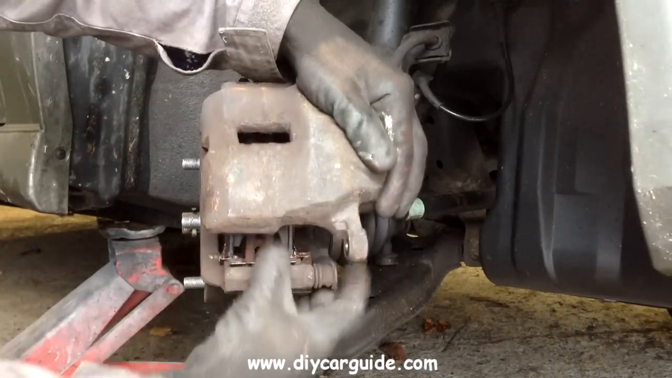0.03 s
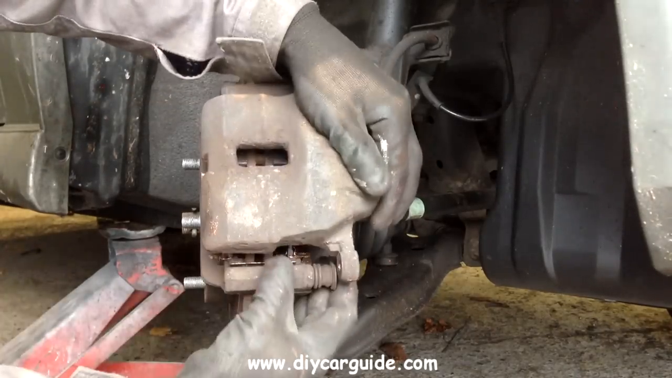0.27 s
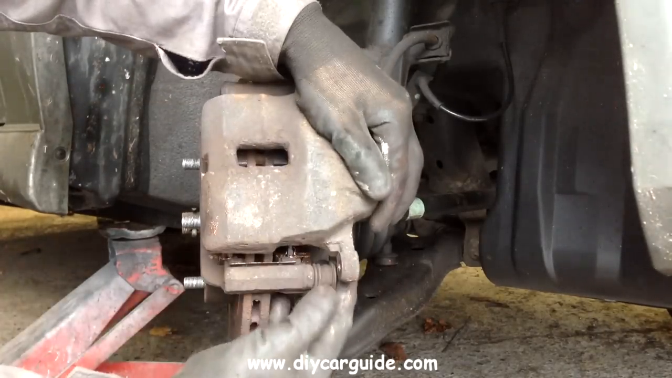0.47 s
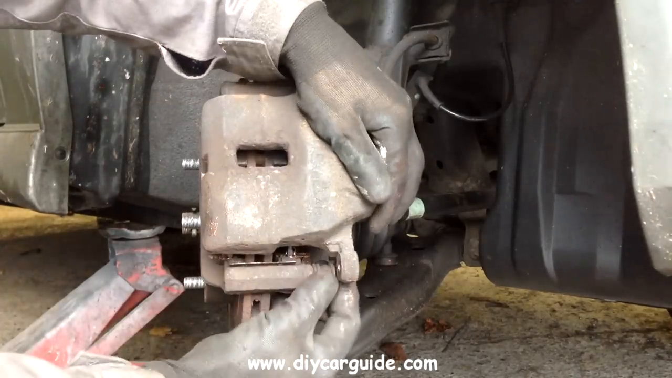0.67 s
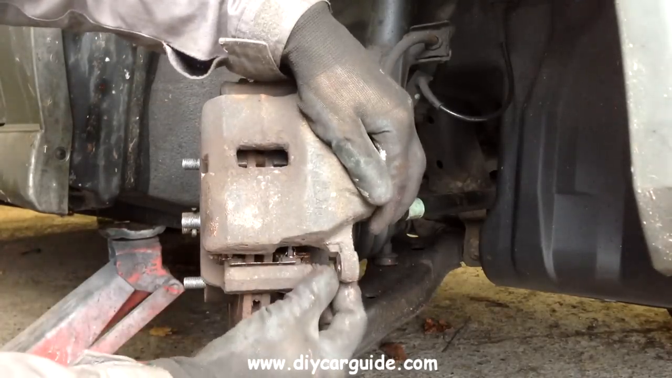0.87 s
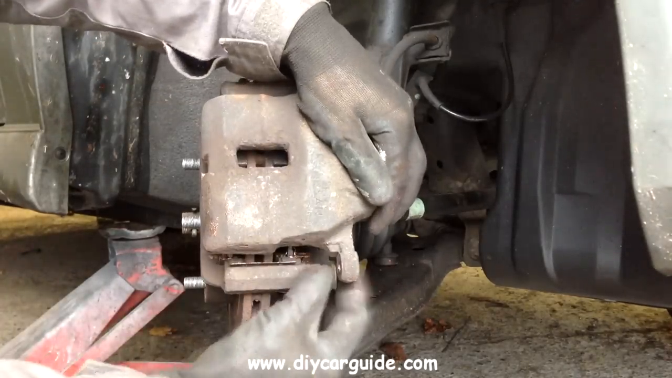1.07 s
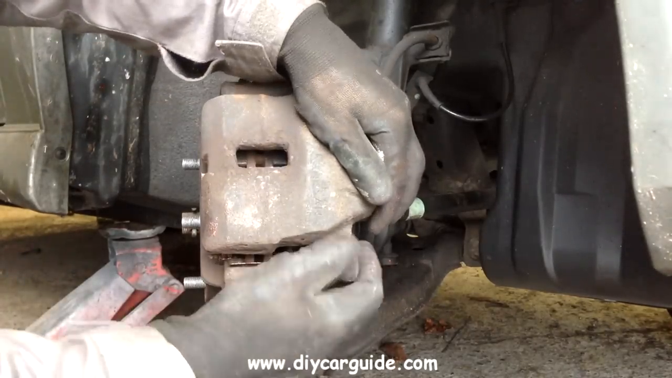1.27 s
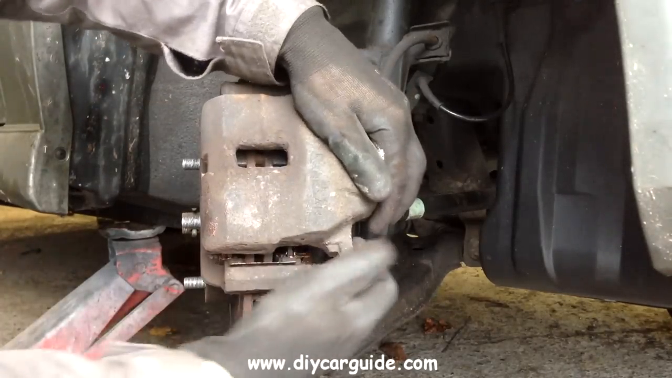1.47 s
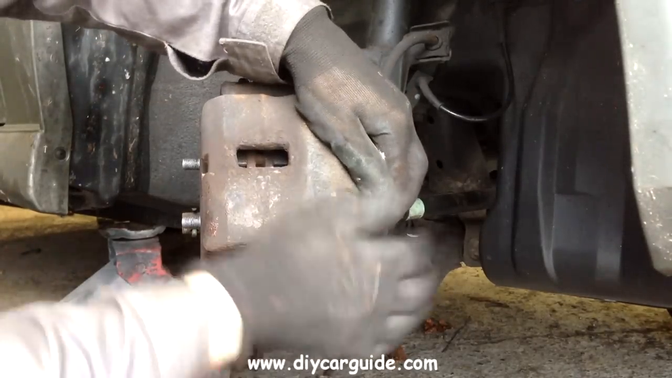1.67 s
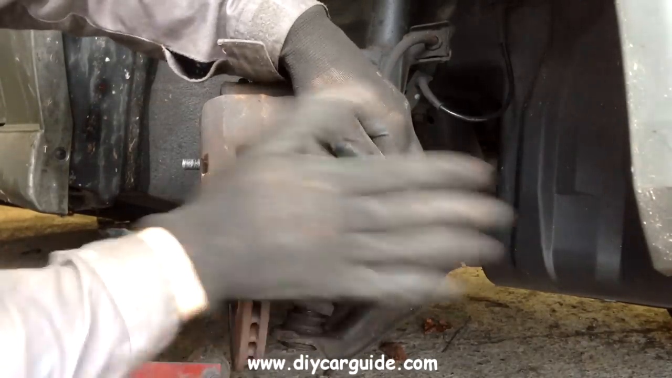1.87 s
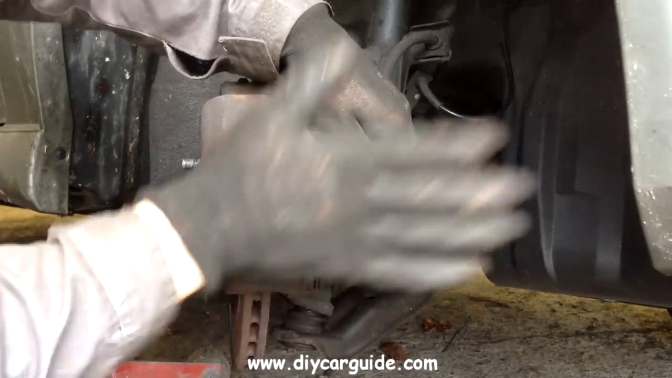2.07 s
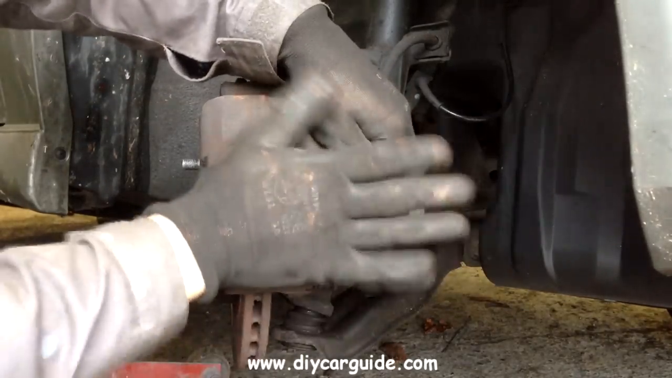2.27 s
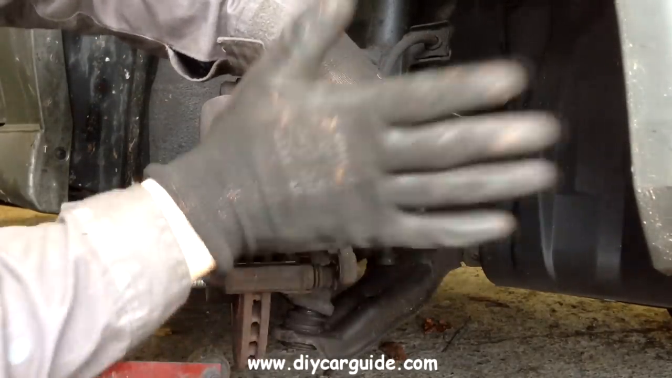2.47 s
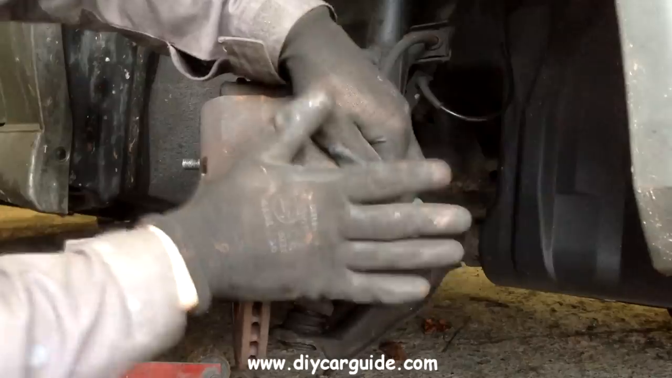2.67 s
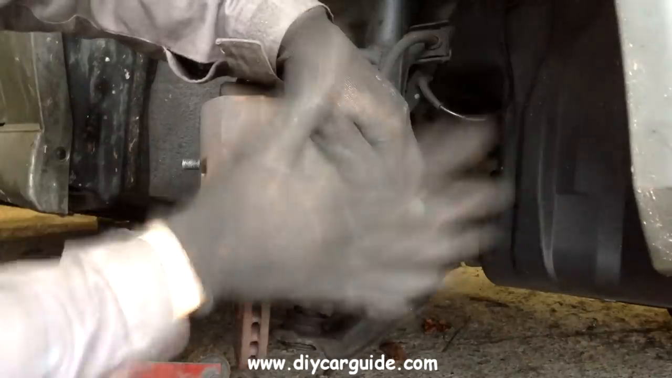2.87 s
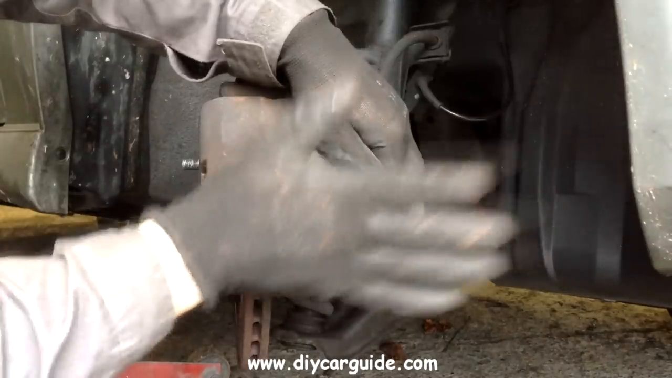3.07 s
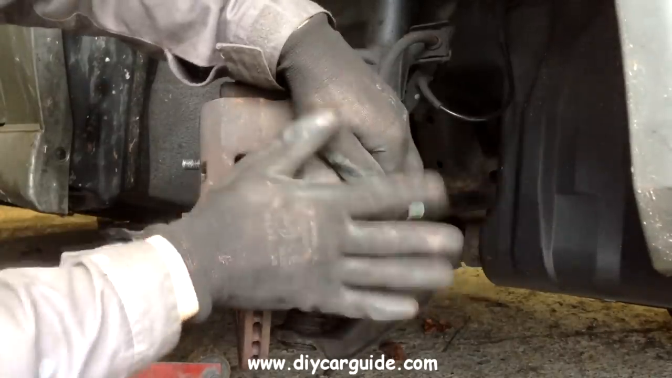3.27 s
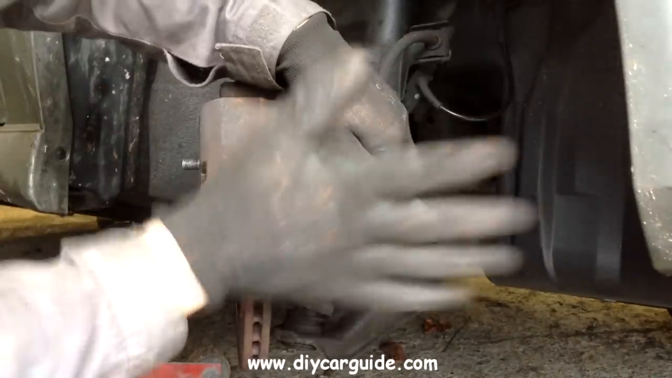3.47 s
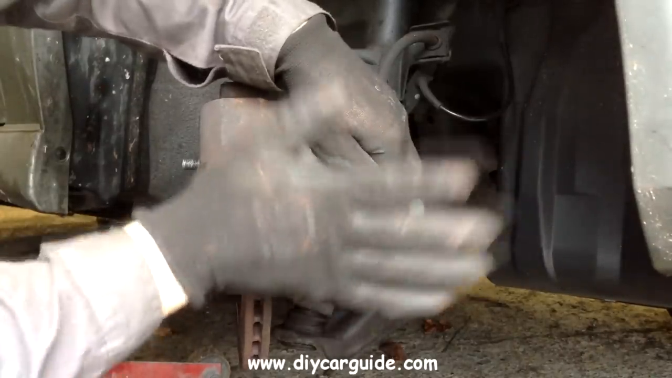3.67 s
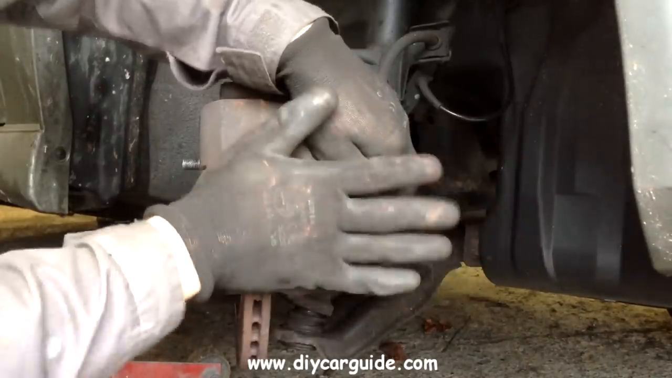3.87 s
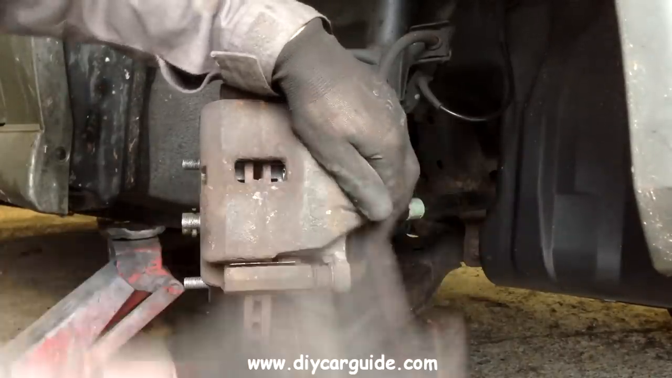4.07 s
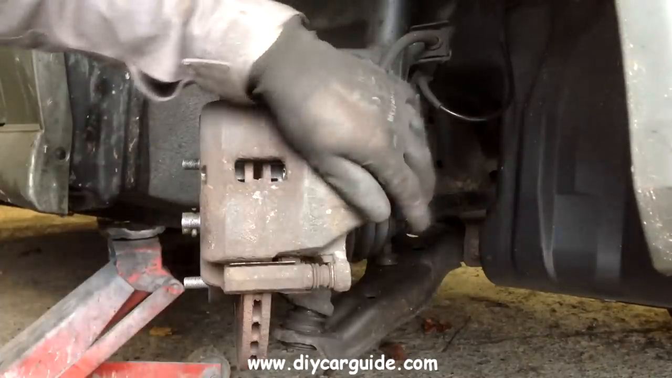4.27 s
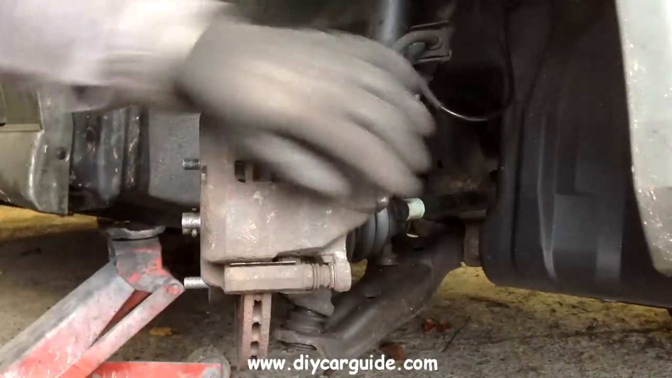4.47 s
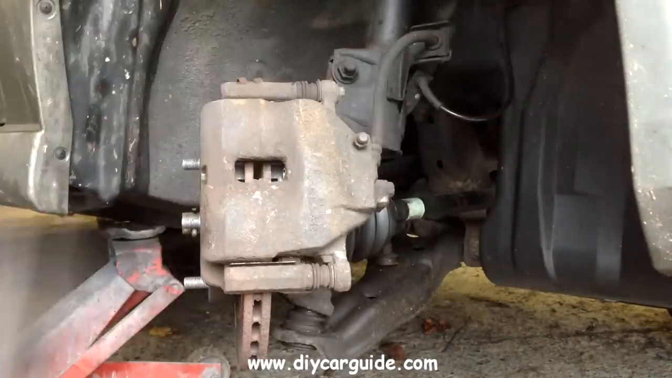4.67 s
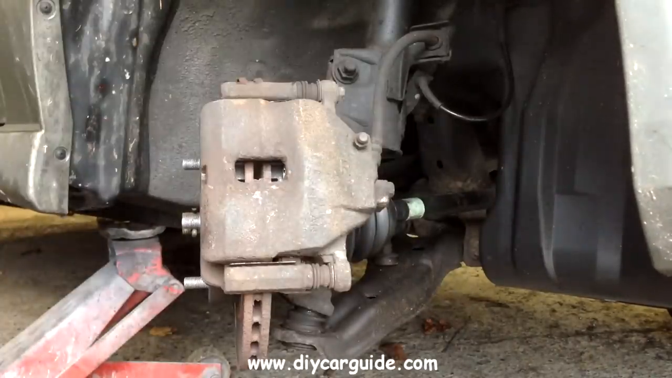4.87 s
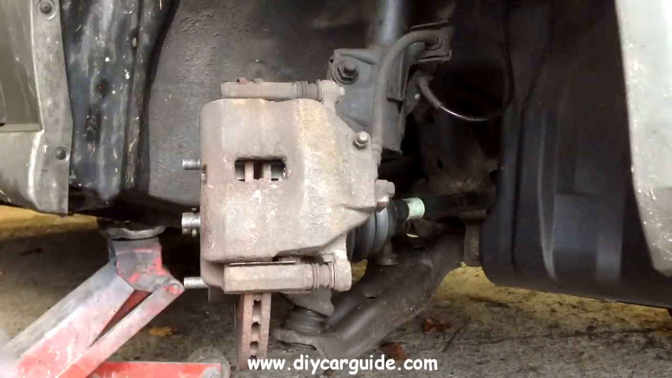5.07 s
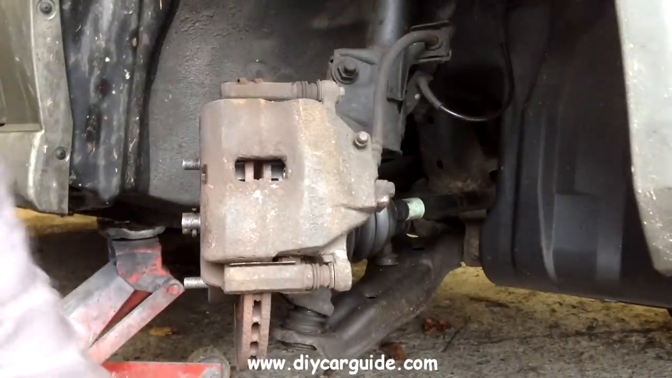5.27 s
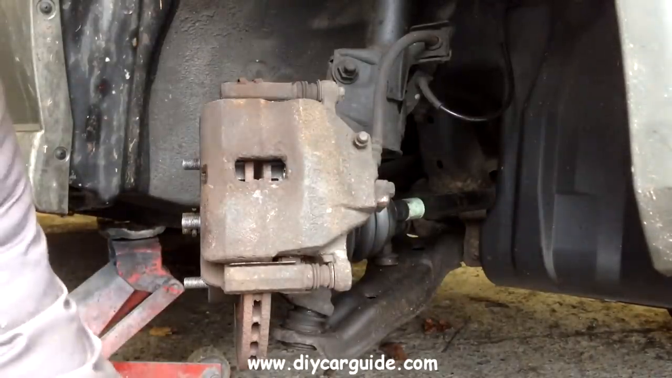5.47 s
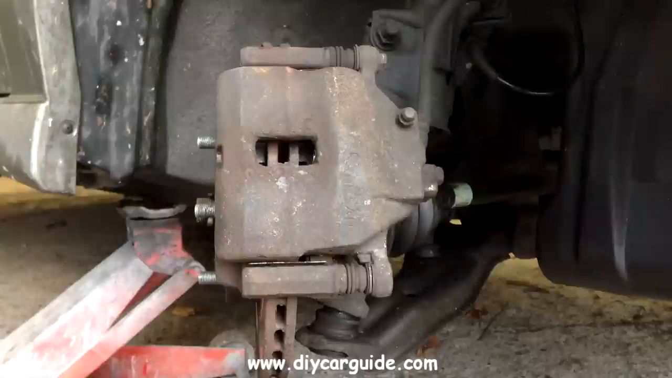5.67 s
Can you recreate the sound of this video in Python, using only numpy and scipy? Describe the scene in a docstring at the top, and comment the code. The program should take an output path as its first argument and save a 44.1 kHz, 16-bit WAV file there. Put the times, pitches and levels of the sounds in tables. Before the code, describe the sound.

A steady low electrical hum and a faint hiss fill a garage throughout. Right at the start, two small steel clicks come in quick succession, the second louder, with a brief rattle. A tiny dry tick follows at 1 second. From about 2 to 3.9 seconds, a gloved palm knocks a metal brake caliper into place seven times, roughly three blows a second. The first is light; the others are loud and brighter, each with a slight scrape, a metal clank and a short boom from the car body. From about 3.3 seconds the caliper is seated, and the thud gives way to a harder clank, the last with a sharp metallic crack. The room adds a weak, short echo. A very faint, thin, high whistle swells and fades a few times, most clearly around 4 seconds. The hum and hiss carry on until the end, near 5.7 seconds.

```python
"""Two small metal clicks sound in a garage, then a tiny tick and seven knocks: a gloved palm drives a brake
caliper down over its pads. Each blow slides it, with friction, until it strikes metal, and excites the damped
modes of hub, suspension and car body, which clank and boom. Harder blows are brighter. Once seated, the caliper
hardly slides and the thud gives way to a harder clank. Mains hum, a faint hiss and a thin, swelling whistle lie
underneath."""
import sys
import numpy as np
from scipy import signal
from scipy.fft import rfft, irfft
from scipy.io import wavfile

SR = 44100
rng = np.random.default_rng(int(sys.argv[2]) if len(sys.argv) > 2 else 0)


def to_wav(sig):
    """Store sig (one row per channel, or 1-D mono) as 16-bit WAV at the path in sys.argv[1].

    Samples outside -1..1 are clipped; the rate is SR.
    """
    pcm = np.clip(np.atleast_2d(sig), -1, 1) * 32767
    pcm = np.round(pcm).astype(np.int16)
    wavfile.write(sys.argv[1], SR, pcm.T)  # frames by channels


N = 253134
T = np.arange(int(.9 * SR)) / SR  # time axis of one event, t/s

# palm blows: t/s, push time/s, force/dB, scrape/dB, favoured f/Hz, stop/dB, stop f/Hz, pad ring/dB
BLOWS = [ (1.9752, 0.011, -14.5, -40.5, 386, -42, 2160, -63),
         (2.3123, .012, -2.5, -21, 520, -14, 4030, -40), (2.6564, .010, 0.6, -22, 201, -11.5, 2190, -36),
         (2.9568, .013, 0, -21, 756, -10, 3960, -29), (3.2855, 0.0031, 0.5, -16.5, 785, -10.5, 2460, -47),
         (3.579, 0.0026, -2, -19.5, 665, -6.5, 1840, -50), (3.8566, 0.016, -1, -23.5, 790, 3.5, 1610, -29)]
# the caliper's response, loose and seated: stop t60/s, pad f/Hz, thud/dB, clank/dB, clang/dB, zing/dB
LOOSE = (0.0262, 3334.5, -1, -4.5, -2.8, -4)
SEATED = (0.0042, 2620.5, -8, -3.5, -2, -8)
SEATED_FROM_S, SLIDE_LOOSE_S, SLIDE_SEATED_S = 3.1, .0100, .0022
# harder blows are brighter: f/Hz, gain per unit of force/(dB/dB)
BRIGHTENING = [(190, .5), (600, 0.88), (1900, 1.08), (4000, 0.9)]
# modes of hub, disc and suspension: f/Hz, relative level/dB, t60/s
HUB_MODES = [(143.4, -5, 1), (162, 4.5, 0.21), (207.7, 2, 0.27), (237.7, -2, 0.29), (315.7, -1, 0.25),
             (393.8, -1.5, 0.23), (421.4, 3.5, 0.12), (478.7, -1.5, 0.14), (556.6, -6, 0.43),
             (590.5, 4, 0.11), (688, -24, 0.12), (765, 1, 0.15), (842, -5, 0.19), (910, 3.5, 0.053),
             (988, -2, 0.044), (1127, -3, 0.11), (1300, -2, 0.062), (1423, -2, 0.041), (1900, -26, 0.05),
             (2380, -3, 0.094), (3285, -4, 0.085), (3790, -22, 0.33), (3994, -5, 0.15), (4355, -30, .18)]
# the crowd of weaker modes in the car's corner: f/Hz, relative spectral level/dB
CLATTER_SPECTRUM = [(50, -10), (95, -3.5), (150, -2.5), (205, -2.5), (280, -6), (700, -5), (1100, -9.5),
                    (2200, -8.5), (4400, -8.5), (6000, -19.5), (9500, -32), (15000, -40)]
# their decay: f/Hz, t60/s
CLATTER_T60 = [(100, 0.94), (250, 0.39), (700, 0.24), (2000, 0.12), (5000, 0.088), (12000, 0.16)]
# dry steel sliding on steel: f/Hz, relative spectral level/dB
SCRAPE_SPECTRUM = [(200, -28), (800, 4), (1800, 1), (4300, -3), (6500, -6), (10000, -10), (15500, -24)]
# the bracket's ring after a stop: f/Hz, level re the stop/dB, t60/s
BRACKET_MODES = [(967, -17, 0.031), (1427, -13.5, 0.032), (1966, -16.5, 0.036)]
# a tiny tick at 1 s, then light jolts of metal during the knocks: t/s, level/dB, f/Hz, t60/s
TICKS = [(1.001, -22.5, 1060, 0.0037), (1.9773, -28, 3120, 0.008), (2.015, -42, 2190, 0.067),
         (2.6588, -11, 2440, 0.0045)]
# small steel parts clicking: t/s, snap level/dB, high-pass f/Hz, ring level/dB
CLICKS = [(0.0648, -21.5, 2940, -30), (0.14, -14, 1410, -38.5)]
# a steel clip's snap, damped at once by the fingers: f/Hz, relative level/dB, t60/s
SNAP_MODES = [(2084, 0, 0.0081), (2710, 6, 0.0044), (4240, 6, 0.0032), (5130, 2.5, 0.0088),
              (6970, -2.5, 0.0073), (7600, 1.5, 0.0053), (8630, -1, 0.0041), (11400, -7, 0.0099),
              (13400, -12, 0.0053)]
CLIP_MODES = [(2060, -7, 0.1), (2450, -12, 0.11), (3286, 2, 0.042), (3446, 4, 0.028), (5600, 2, 0.027),
              (7700, 2, 0.046), (9100, -9, 0.039), (10560, -3, 0.023)]
# the brief rattle in a click: f/Hz, relative spectral level/dB
RATTLE_SPECTRUM = [(500, 2), (1900, -10), (2800, 5), (3900, -11), (5000, 2), (6000, -13), (7200, -1),
                   (9500, -3), (11500, -8), (15500, -10)]
# loose steel buzzing after a click: f/Hz, relative spectral level/dB
BUZZ_SPECTRUM = [(1100, -28), (1800, -4), (2450, 1), (3300, -12), (6000, -24)]
# reverberation time of the garage: f/Hz, t60/s
GARAGE_T60 = [(150, 0.75), (2500, 0.42), (6000, 0.3), (14000, 0.34)]
# mains hum: harmonic number, rms level/dB
HUM_HARMONICS = [(1, -25.5), (2, -69), (3, -57.5), (5, -64), (6, -69), (7, -65), (9, -65.5), (11, -75),
                 (15, -70)]
MAINS_HZ = 50.066
# background hiss: f/Hz, relative spectral level/dB
HISS_SPECTRUM = [(40, -3), (100, 0.5), (160, -4), (300, -9.5), (550, -11.5), (1500, -15.5), (3000, -22.5),
                 (7000, -26.5), (12500, -28), (14800, -22.5)]
# swells of a whistling hiss: peak t/s, half-width/s, rms level at the peak/dB
WHISTLE_SWELLS = [(.88, .12, -66), (2.7, .3, -65), (3.955, .28, -56.5), (5.247, 0.27, -66.5)]


def blow(push_s, force_db, scrape_db, favoured_hz, pad_db, pad_hz, thud_db, clank_db, clang_db, zing_db):
    """Forced vibration: a push with sliding friction drives hub, car body and pad, which then decay."""
    grit = noise() * undb(5.8 * noise())
    scrape = unit(colour(grit, SCRAPE_SPECTRUM)) * swell(push_s, 0.042)
    # seating and force set the balance from thud to zing
    grid_hz = np.geomspace(100, 4000, 80)
    balance_db = at_hz([(190, thud_db), (450, clank_db), (850, clank_db),
                        (1500, clang_db), (2400, clang_db), (4000, zing_db)], grid_hz)
    # where the palm lands decides which group of modes answers most
    lift_db = 5 * np.exp(-(np.log2(grid_hz / favoured_hz) / .19) ** 2)
    excitation = np.transpose([grid_hz, balance_db + force_db * at_hz(BRIGHTENING, grid_hz) + lift_db])
    driven_modes = [(hz, db + at_hz(excitation, hz), t60) for hz, db, t60 in HUB_MODES]
    # the heavy parts take up the push a little longer
    hub = modes(driven_modes, push_s + 0.015, scatter_db=0.03, detune=0.0045)
    clatter = dense_ring(colour(shaped_noise(CLATTER_SPECTRUM), excitation), CLATTER_T60, push_s)
    pad = pad_ring(pad_hz, push_s, t60=0.29, split_hz=26)
    palm = 1 - np.exp(-T / 0.0006)  # a soft palm builds its force gradually
    return palm * (undb(scrape_db) * scrape + undb(-28) * hub + undb(-14.5) * clatter + undb(pad_db) * pad)


def pad_ring(hz, push_s, t60, split_hz):
    """Beating: a pad and its shim ring at close frequencies; their loose contact adds flutter."""
    pair = modes([(hz, 0, t60), (hz + split_hz, -8, t60)], push_s, scatter_db=0.0, detune=0.00083)
    flutter = shaped_noise([(90, 0), (400, -40), (2000, -80)])
    return pair * (1 + .4 * flutter)


def stop(hz, t60):
    """Impact excitation: the slide ends against metal and the bracket rings briefly."""
    return tick(hz, t60, crack_db=-5.5) + modes(BRACKET_MODES, 0.00072, scatter_db=1.2, detune=.015)


def tick(hz, t60, crack_db):
    """Heavy damping: a short-lived resonance with a rough crack in it."""
    crack = shaped_noise([(hz / 4, -14), (hz, 0), (hz * 2, -6), (hz * 5, -20), (hz * 10, -34)])
    onset = 1 - np.exp(-T * hz * 4)
    return (np.sin(2 * np.pi * hz * T) + undb(crack_db) * crack) * fade(t60) * onset


def click(snap_db, cutoff_hz, ring_db):
    """Impulsive excitation: a light steel clip snaps home, then rattles, rings and buzzes."""
    snap = modes(SNAP_MODES, .0001, scatter_db=.8, detune=0.0044)
    rattle = shaped_noise(RATTLE_SPECTRUM) * swell(0.004, 0.053)
    ring = modes(CLIP_MODES, 0.0012, scatter_db=1.0, detune=0.0053)
    buzz = shaped_noise(BUZZ_SPECTRUM) * fade(t60=0.19)
    sound = undb(snap_db) * (snap + undb(-15.5) * rattle + undb(-22.5) * buzz) + undb(ring_db) * ring
    return signal.sosfilt(signal.butter(4, cutoff_hz, btype="high", fs=SR, output="sos"), sound)


def garage(x, wet_db):
    """Reverberation: the walls return a weak, diffuse tail that dulls as it fades."""
    reflections = colour(noise(), [(150, -3.0), (2500, 5.5), (6000, 1.5), (14000, -1.0)])
    tail = dense_ring(reflections, GARAGE_T60, push_s=0.0068)
    return x + undb(wet_db) * signal.fftconvolve(x, tail / np.sqrt(np.sum(tail ** 2)))[:N]


def hum_and_hiss():
    """Harmonic series: steady mains hum with weak, mostly odd overtones, over broadband noise."""
    t = np.arange(N) / SR
    hum = sum(np.sqrt(2) * undb(db) * np.cos(2 * np.pi * k * MAINS_HZ * t) for k, db in HUM_HARMONICS)
    hiss_db = np.interp(t, [0, 3], [-53.5, -50.5])  # creeps up, then holds
    return hum + shaped_noise(HISS_SPECTRUM, N) * undb(hiss_db)


def whistle(centre_hz, half_width_hz):
    """Narrow-band noise has a pitch: a faint whistle comes and goes in smooth swells."""
    t, hz = np.arange(N) / SR, np.fft.rfftfreq(N, 1 / SR)
    band = irfft(rfft(noise(N)) / (1 + ((hz - centre_hz) / half_width_hz) ** 2), N)
    envelope = sum(undb(db) * np.exp(-((t - s) / half_s) ** 2) for s, half_s, db in WHISTLE_SWELLS)
    return unit(band) * envelope


def modes(table, push_s, scatter_db, detune):
    """Modal superposition: damped sines whose level, tuning and phase vary with each contact."""
    draws = rng.standard_normal((len(table), 3))
    return sum(undb(db + scatter_db * gain) * swell(push_s, t60)
               * np.sin(2 * np.pi * (hz * (1 + detune * shift) * T + phase))
               for (hz, db, t60), (gain, shift, phase) in zip(table, draws))


def dense_ring(x, t60s, push_s):
    """Modal overlap: crowded modes act as noise, each octave decaying at its own rate."""
    octave = np.log2(np.maximum(np.fft.rfftfreq(len(T), 1 / SR), 1) / (SR / 2))
    spectrum = rfft(x)
    bands = (irfft(spectrum * np.maximum(1 - abs(octave + k), 0), len(T)) for k in range(10))
    return sum(band * swell(push_s, at_hz(t60s, SR / 2 ** (k + 1))) for k, band in enumerate(bands))


def swell(push_s, t60):
    """Resonant build-up: energy grows linearly during the push, then decays freely."""
    return np.sqrt(np.minimum(T / push_s, 1)) * np.exp(-np.log(1000) * np.maximum(T - push_s, 0) / t60)


def fade(t60):
    """Exponential decay, 60 dB down after t60."""
    return np.exp(-np.log(1000) * T / t60)


def noise(length=len(T)):
    """Gaussian white noise."""
    return rng.standard_normal(length)


def shaped_noise(spectrum, length=len(T)):
    """Filtered noise of rms 1."""
    return unit(colour(noise(length), spectrum))


def colour(x, points):
    """Spectral weighting by (f/Hz, gain/dB) points."""
    return irfft(rfft(x) * undb(at_hz(points, np.fft.rfftfreq(len(x), 1 / SR))), len(x))


def at_hz(points, hz):
    """Interpolation of (f/Hz, value) points on a log-frequency axis."""
    f, value = np.transpose(points)
    return np.interp(np.log(np.maximum(hz, 1)), np.log(f), value)


def undb(db):
    """Decibels to amplitude ratio."""
    return 10 ** (np.asarray(db) / 20)


def unit(x):
    """Normalisation to rms 1."""
    return x / np.sqrt(np.mean(x ** 2))


def add(out, s, x):
    """Superposition of x on out from time s."""
    i = max(int(s * SR), 0)
    out[i:i + len(x)] += x[:N - i]


def scene():
    """Superposition: blows, stops, clicks and ticks add to the hum, hiss and whistle."""
    work = np.zeros(N)
    for s, push_s, force_db, scrape_db, favoured_hz, stop_db, stop_hz, pad_db in BLOWS:
        loose = s < SEATED_FROM_S
        slide_s = SLIDE_LOOSE_S if loose else SLIDE_SEATED_S
        stop_t60, *timbre = LOOSE if loose else SEATED
        add(work, s, blow(push_s, force_db, scrape_db, favoured_hz, pad_db, *timbre))
        add(work, s + slide_s, undb(stop_db) * stop(stop_hz, stop_t60))
    for s, snap_db, cutoff_hz, ring_db in CLICKS:
        add(work, s, click(snap_db, cutoff_hz, ring_db))
    for s, db, hz, t60 in TICKS:
        add(work, s, undb(db) * tick(hz, t60, crack_db=-4.0))
    return (garage(work, wet_db=-20.0) + hum_and_hiss() + whistle(centre_hz=3410, half_width_hz=230))[None]


def record(dry):
    """Soft saturation rounds the loudest peaks; a steep low-pass cuts the top."""
    rounded = np.tanh(.9 * dry) / .9
    return signal.sosfilt(signal.ellip(10, .2, 80, 15600, fs=SR, output="sos"), rounded)


dry = scene()
out = record(dry)
to_wav(out)
```